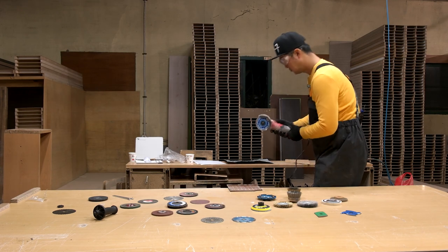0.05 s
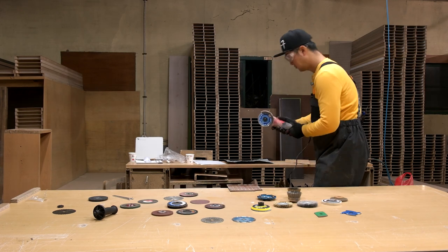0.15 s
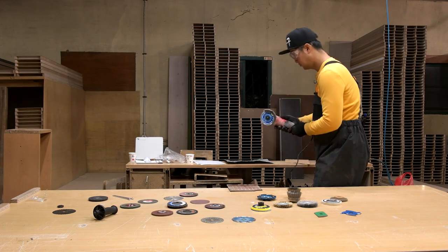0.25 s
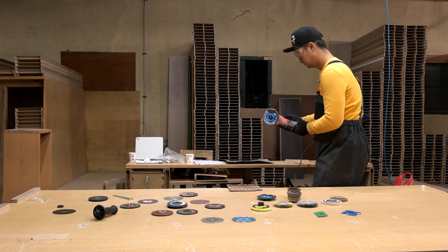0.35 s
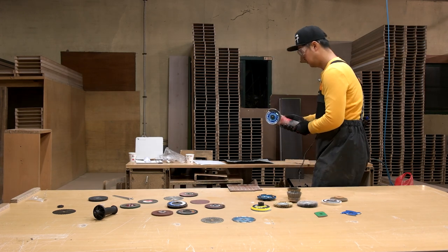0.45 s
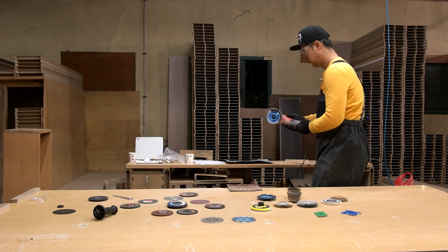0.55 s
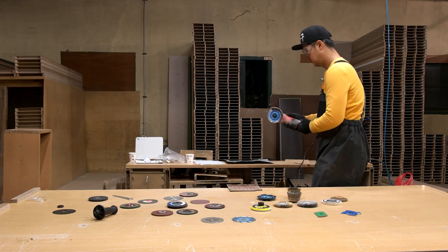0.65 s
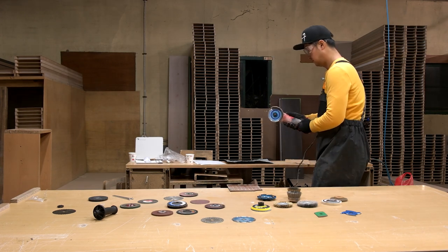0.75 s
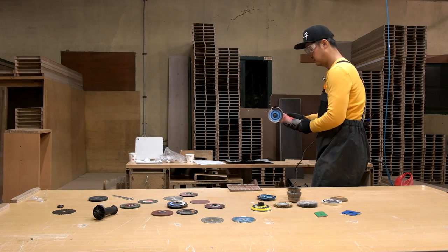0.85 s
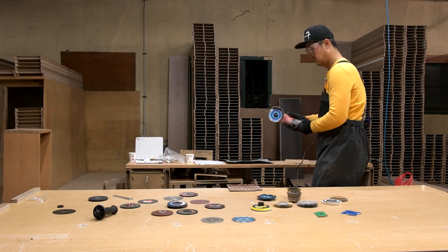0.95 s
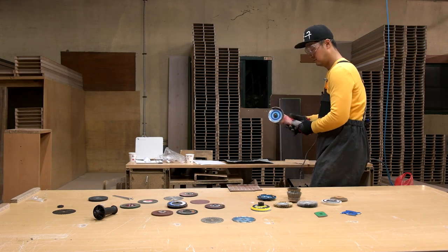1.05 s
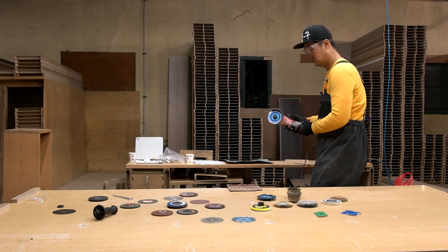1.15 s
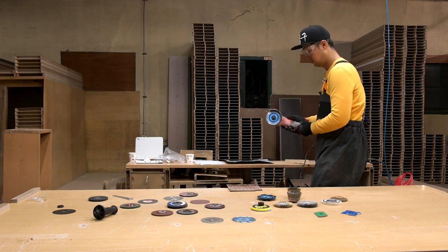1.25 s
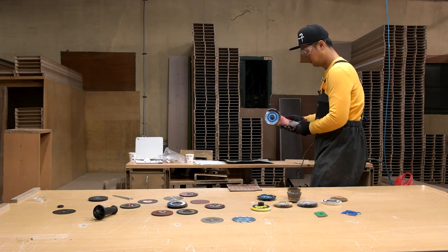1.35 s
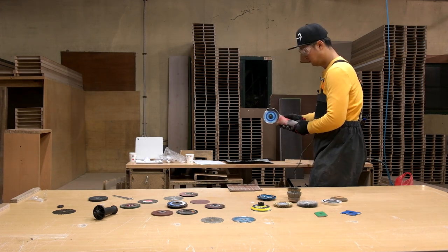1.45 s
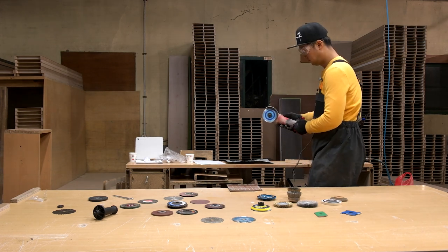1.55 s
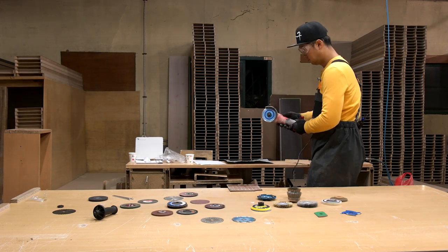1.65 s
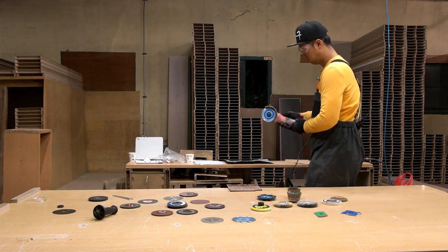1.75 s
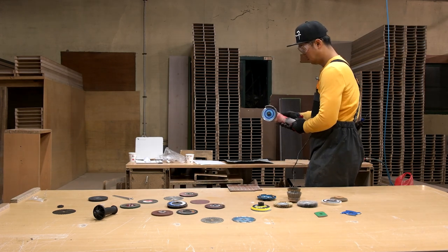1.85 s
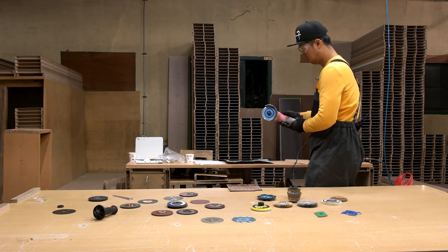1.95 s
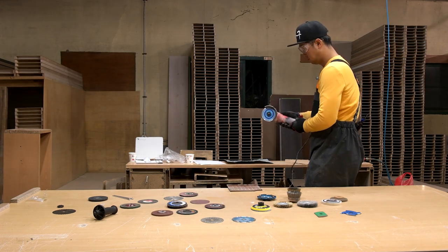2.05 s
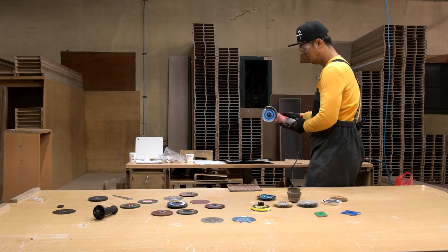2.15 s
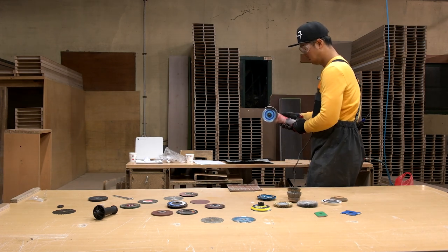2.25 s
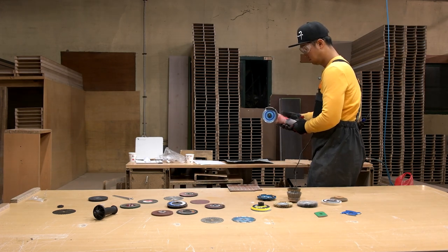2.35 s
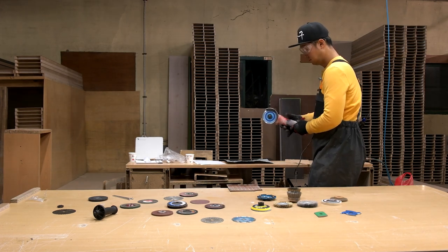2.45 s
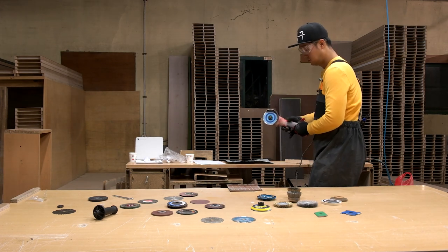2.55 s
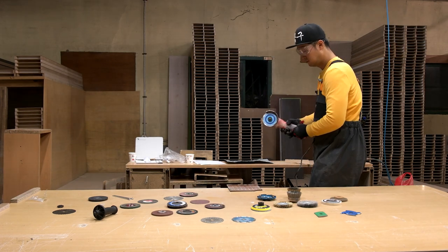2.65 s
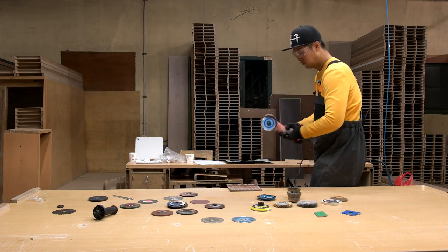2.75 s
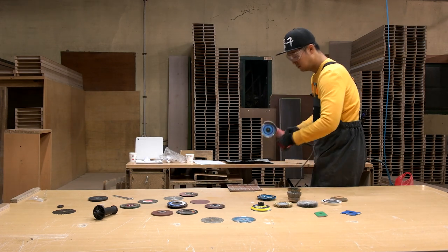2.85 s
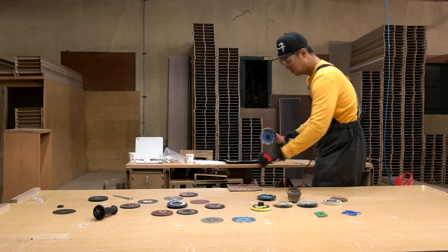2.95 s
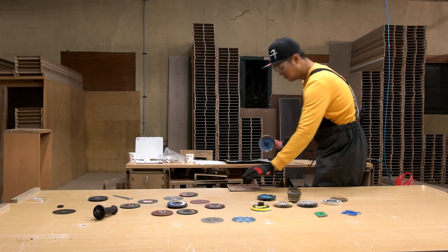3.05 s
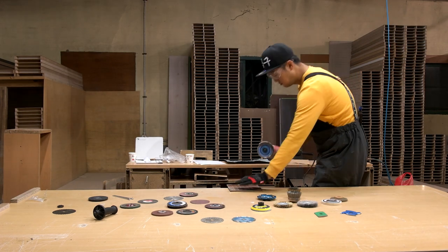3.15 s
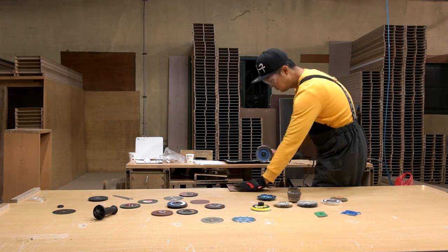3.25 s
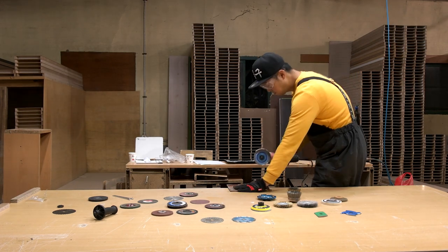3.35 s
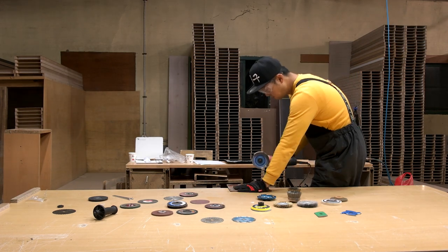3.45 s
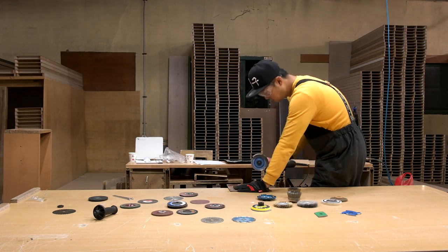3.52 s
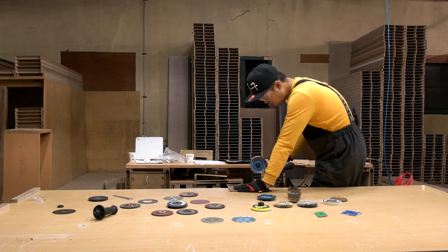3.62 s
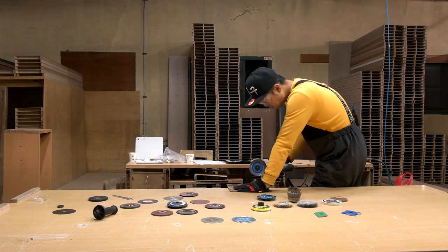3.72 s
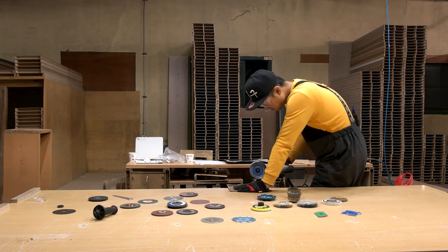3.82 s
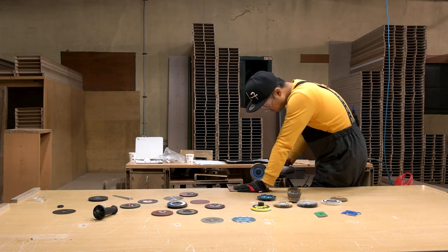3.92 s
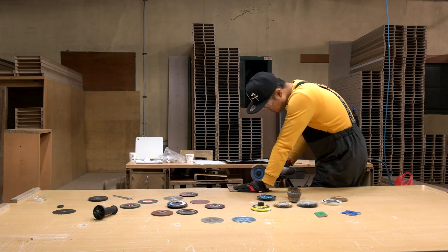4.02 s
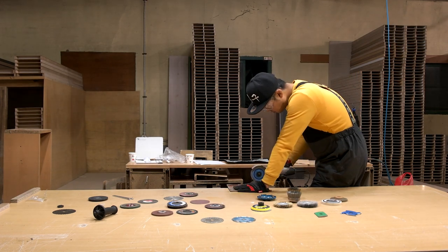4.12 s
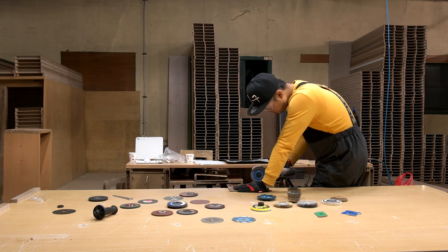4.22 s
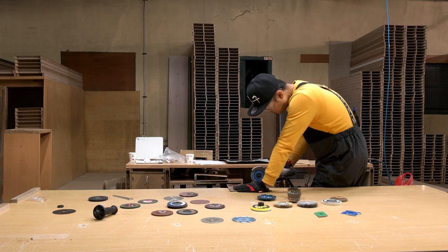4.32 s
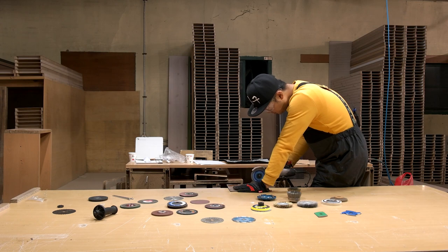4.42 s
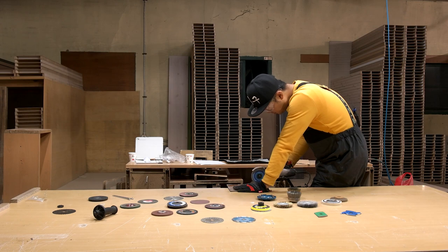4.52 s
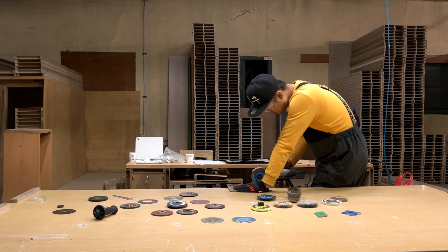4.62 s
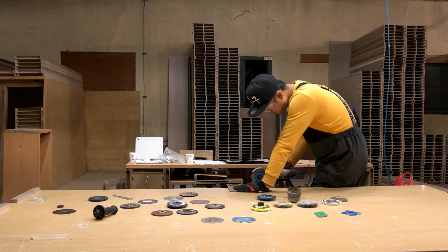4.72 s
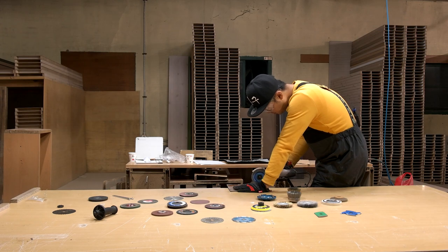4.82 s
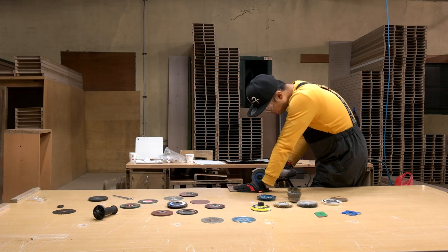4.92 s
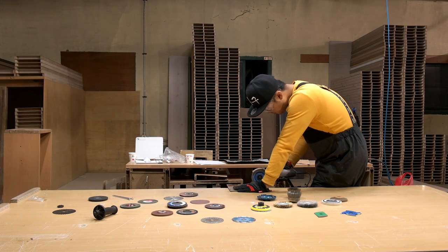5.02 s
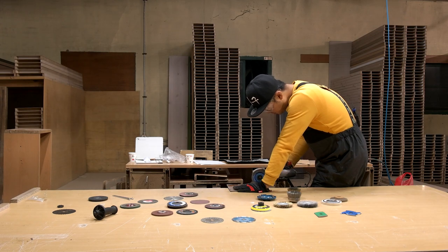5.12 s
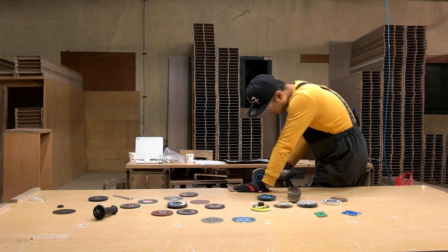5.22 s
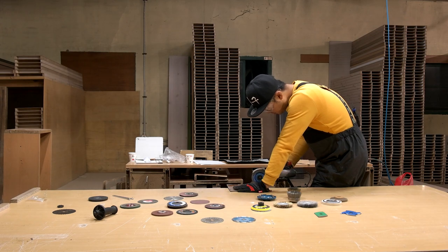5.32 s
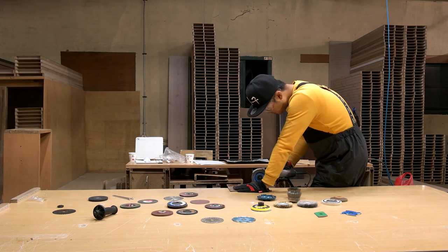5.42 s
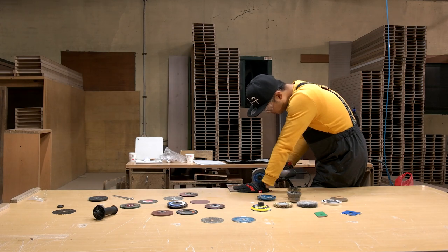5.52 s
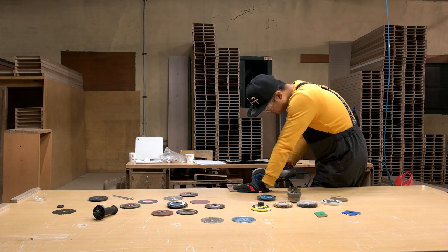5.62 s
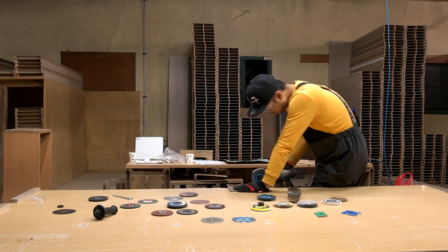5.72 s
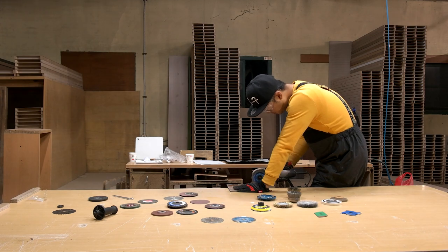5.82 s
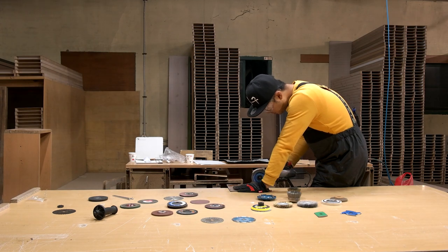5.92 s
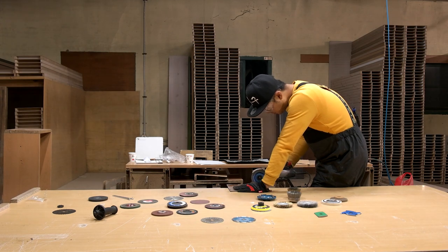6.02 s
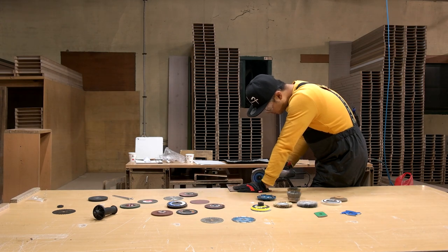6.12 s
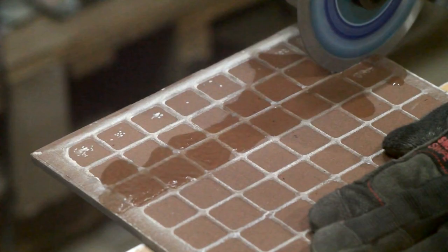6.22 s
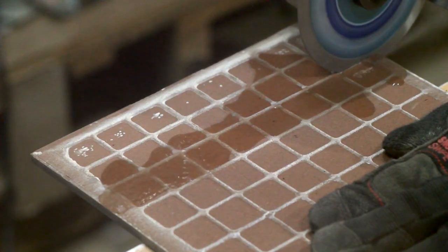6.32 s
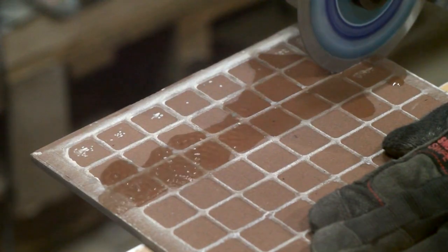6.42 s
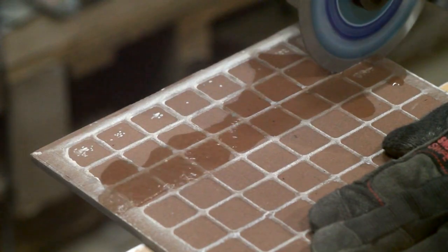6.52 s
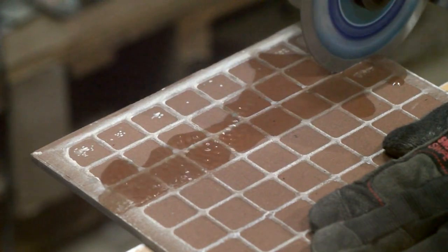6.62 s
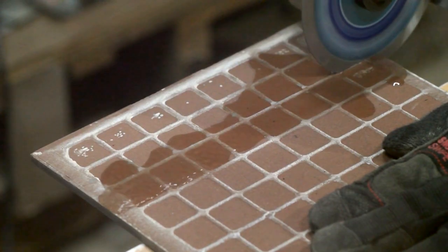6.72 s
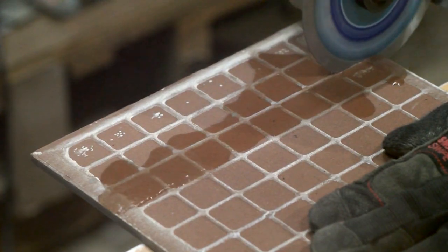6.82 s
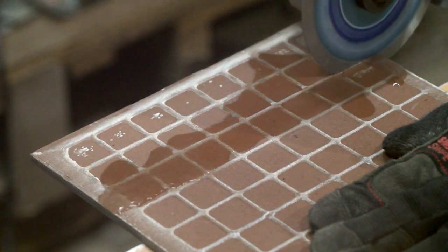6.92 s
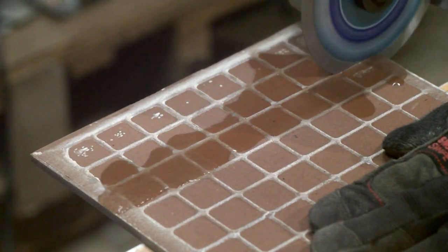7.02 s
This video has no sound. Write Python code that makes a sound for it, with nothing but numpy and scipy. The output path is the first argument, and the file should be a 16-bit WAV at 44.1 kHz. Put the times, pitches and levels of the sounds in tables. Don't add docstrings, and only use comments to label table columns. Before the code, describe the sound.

Near-silent hall wash with a faint electrical buzz, then an angle grinder kicks on briefly and coasts down with loose gear clatter. It restarts with a hard growl, climbs to a loud, airy, whining full speed and holds. At the end the disc bites into tile, adding gritty grinding, ringing and thin squeals. Close stereo microphones in a large reverberant workshop, slightly overloaded by the loud tool.

```python
import sys
import numpy as np
from scipy import signal
from scipy.fft import rfft, irfft, next_fast_len
from scipy.io import wavfile
from scipy.ndimage import uniform_filter1d

SR = 44100
rng = np.random.default_rng(int(sys.argv[2]) if len(sys.argv) > 2 else 0)


def field_ratio(decibels):
    return 10 ** (np.asarray(decibels, dtype=float) / 20)


def wrap_up_sound(samples):
    columns = np.atleast_2d(samples).T
    tamed = np.clip(columns, -1, 1)
    steps = np.round(tamed * 32767).astype(np.int16)
    wavfile.write(sys.argv[1], SR, steps)


N = 311787
T = np.arange(N) / SR

# [f/Hz, level/dB per Hz]
HALL_COLOUR = [(18, -47), (30, -22), (284, -5.5), (431, -8), (727, -3), (873, -7), (944, -5), (2180, -8.5),
               (6360, -8), (15400, -17)]
# [f/Hz, level/dB]
LAMP = [(958.2, -70), (2040, -74), (3601, -73), (4560, -83), (5879, -72), (6002, -72), (6121, -72),
        (6239, -73), (6481, -72), (7321, -73), (8166, -80), (8640, -82)]
# [f/Hz, likeness 0-1]
LIKENESS = [(60, 0.03), (150, 0.4), (380, 0.96), (950, 0.76), (2380, 0.24), (5980, 0.1), (15000, 0.031)]
# [f/Hz, t60/s]
HALL_DECAY = [(200, .7), (2000, .5), (8000, .3), (16000, .16)]
# [t/s, aim/turns per s, time constant/s]
STAGES = [
    (.695, 443, .1),
    (1.0, 0, 1.45),
    (1.89, 510, .21),
    (2.2, 611, .39),
    (5.4, 606, .3),
]
# [start t/s, rise/s, end t/s, first level/dB, last level/dB]
SURGES = [
    (.696, 0.0056, 0.889, -14, -9.5),
    (1.895, 0.053, 2.017, -6, -8.5),
]
# [t/s, peak level/dB]
SLAPS = [(1.325, -4), (1.3774, -5), (1.5364, -13), (1.554, 1.5), (1.5885, -2), (1.696, 3.5), (1.755, -12),
         (1.7984, -6), (1.8164, -18), (1.83, -9), (1.84, -17), (1.8694, 2), (1.899, -1), (1.9065, 1.5)]
# [f/Hz, width/Hz, level/dB]
HOUSING = [(449, 64, -23), (975, 660, -16), (2727, 374, 2.5), (3890, 850, -6), (5320, 560, -15.5),
           (7160, 810, -3.5), (8150, 680, -8.5), (13700, 900, -28)]
# [f/Hz, level/dB per Hz]
RATTLE_BODY = [(88, -75), (150, -50), (427, -10.5), (2220, 6), (2750, -32), (4830, -2.5), (8150, 6.5),
               (10700, -114), (15400, 2.5)]
# [f/Hz, level/dB per Hz]
ROAR = [(88, -58), (150, -38.5), (427, -25), (462, -21.5), (606, -14), (1000, -10.5), (1220, -8),
        (1630, -5.5), (2920, -4.5), (4920, -8), (7250, -8.5), (11800, -18), (15400, -23.5)]
# [multiple of its rotation, level/dB]
SHAFT_ORDERS = [(2, -31), (3, -33), (4, -33), (9, -37), (10, -36), (12, -35)]
# [t/s, level/dB]
BITE = [
    (5.2, -28),
    (5.44, -16),
    (5.66, -25),
    (5.81, -18),
    (6.12, -19),
    (6.6, -16),
    (7.07, -14.5),
]
DISC_HZ = [1476, 2267, 2350, 2622, 2755, 2956, 3013, 3321, 3646, 3931, 4022, 4352, 4754, 6251, 6739, 7720,
           8053, 8292, 8975, 9320, 10072, 10131, 10256, 10622, 11350, 11924, 11998, 12498, 14110, 14700]
# [width/Hz, level at first touch/dB, level in a deep groove/dB]
DISC_MODES = [(22, -22.5, -32.5), (18, -28, -29), (20, -34, -31), (11, -22, -25), (20, -41, -44),
              (20, -20, -36), (20, -29, -27.5), (20, -38, -44), (10, -24, -36), (24, -18.5, -39),
              (40, -17, -26), (24, -22, -34), (10, -32, -33), (18, -24, -27.5), (19.9, -20, -26.5),
              (17.9, -23, -24.5), (40, -17.5, -30), (40, -34, -30), (70, -28, -28), (50, -38, -39),
              (40, -27.5, -27), (30, -33, -35), (30, -30, -31), (45, -36, -30), (50, -26, -42),
              (30, -28, -28.5), (28, -25, -34), (50, -28, -30), (120, -35, -39), (260, -31, -32)]
# [f/Hz, level/dB per Hz]
GRIND = [(88, -64), (150, -36), (320, -18), (436, -18), (618, -17.5), (2020, -7.5), (2590, -0.5),
         (5020, -18.5), (6580, -11.5), (12300, -17.5), (13500, -23), (15400, -27)]
# [multiple of its rotation, level/dB]
SPINDLE_ORDERS = [(2, -45), (2.5, -42), (4, -47), (6, -47)]
# [start t/s, end t/s, f/Hz, level/dB]
SQUEALS = [(5.85, 7.1, 2622, -24), (5.58, 6.06, 3931, -22), (6.3, 6.86, 3647, -21), (6.2, 6.76, 4755, -23),
           (5.54, 7.1, 6739, -24.5), (5.54, 7.1, 7720, -28), (6.1, 7.1, 2267, -26), (5.5, 7.1, 11998, -33),
           (5.7, 7.1, 10256, -36)]
# [f/Hz, level/dB]
TREBLE_DROOP = [(14600, 0), (15100, -5), (15800, -12)]

FAN_BLADES, PINION_TEETH, GEAR_RATIO = 35, 12, 3.755
SWITCH_S, RELEASE_S, RESTART_S = .684, 1.0, 1.89
CREEP, FULL = 30, 610
TAKE_UP_DB = -22


def evened(x):
    return x / np.sqrt(np.mean(x ** 2) + 1e-20)


def read(points, hz):
    f, value = np.transpose(points)
    return np.interp(np.log(hz + 1), np.log(f + 1), value)


def coloured(x, spectrum):
    size = next_fast_len(N)
    gain = field_ratio(read(spectrum, np.fft.rfftfreq(size, 1 / SR)))
    return evened(irfft(rfft(x, size) * gain, size)[..., :N])


def slow(per_s, size=N):
    steps = rng.standard_normal(size // 64 + 2)
    span = max(int(SR / 64 / per_s), 1)
    drift = evened(uniform_filter1d(uniform_filter1d(steps, span), span))
    return np.interp(np.arange(size) / 64, np.arange(len(steps)), drift)


def tone(phase_turns, db):
    return field_ratio(db) * np.sqrt(2) * np.sin(2 * np.pi * (phase_turns + rng.random()))


def orders(turns, table):
    return sum(tone(k * turns, db + 2.5 * slow(2.8)) for k, db in table)


def ring(x, hz, width):
    r = np.exp(-np.pi * abs(width) / SR)
    return evened(signal.lfilter([1, 0, -1], [1, -2 * r * np.cos(2 * np.pi * hz / SR), r * r], x))


def gliding_band(x, hz, width):
    turn = np.exp(2j * np.pi * np.cumsum(hz * np.ones(N)) / SR)
    r = np.exp(-np.pi * abs(width) / SR)
    for _ in range(2):
        x = evened((turn * signal.lfilter([1 - r], [1, -r], x / turn)).real)
    return x


def diffuse():
    size = next_fast_len(N)
    a, b = rfft(rng.standard_normal((2, size)))
    same = np.clip(read(LIKENESS, np.fft.rfftfreq(size, 1 / SR)), 0, 1)
    return irfft(np.array([a, same * a + np.sqrt(1 - same ** 2) * b]), size)[:, :N]


def hall_floor():
    a, b = rng.standard_normal((2, N))
    wash = coloured(np.array([a + 0.11 * b, 0.13 * a + b]), HALL_COLOUR)
    wash_db = np.maximum(-49 - 6 * T, -55) + 4 * np.exp(-T / .05)
    return wash * field_ratio(wash_db) + sum(tone(hz * T, db) for hz, db in LAMP)


def switched_on():
    return np.clip((T - SWITCH_S) / 0.0059, 0, 1) ** 2


def motor_speed():
    speed = np.full(N, float(CREEP))
    for s, aim, tau in STAGES:
        at = round(s * SR)
        speed[at:] = aim + (speed[at] - aim) * np.exp(-(T[at:] - s) / tau)
    return speed


def states():
    coasting = uniform_filter1d(1. * (T > RELEASE_S - .06) * (T < RESTART_S), 900)
    cutting = np.clip((T - 5.45) / 1.04, 0, 1)
    return coasting, cutting


def surge():
    gain, fade_s = np.zeros(N), 0.028
    for s, rise, end, first_db, last_db in SURGES:
        times = np.cumsum([s - .001, .001, rise, end - s - rise, fade_s, fade_s])
        gain += field_ratio(np.interp(T, times, [-60, TAKE_UP_DB, first_db, last_db, TAKE_UP_DB, -60]))
    return gain


def rattle():
    coasting, cutting = states()
    driven_db = np.where(T < SURGES[0][0], TAKE_UP_DB, -17 + 1 * cutting)
    loose_db = -14 - 8.5 * (T - RELEASE_S)
    return np.hypot(field_ratio(driven_db + coasting * (loose_db - driven_db)), surge())


def knocks(per_s, spread_db):
    hit = rng.random(N) < per_s / SR
    size = rng.exponential(1, N)
    sign = rng.choice([-1., 1.], N)
    return evened(hit * sign * field_ratio(spread_db * np.minimum(size, 5)))


def gears():
    teeth = knocks(3000, spread_db=3.5) * field_ratio(0.82 * slow(25))
    for s, db in SLAPS:
        teeth[round(s * SR)] += field_ratio(db + 32)
    rings = sum(field_ratio(db) * ring(ring(teeth, hz, width), hz, width) for hz, width, db in HOUSING)
    body = field_ratio(2.5) * coloured(teeth, RATTLE_BODY)
    return field_ratio(-5) * rattle() * (rings + body) * switched_on()


def fan_roar(air, speed):
    _, cutting = states()
    steady = field_ratio(-16.5 + 33.5 * np.log10(speed / FULL) - 3.5 * cutting)
    pushed = field_ratio(-15) * surge() * speed / 300
    return field_ratio(8.0) * np.hypot(steady, pushed) * coloured(air, ROAR)


def tooth_mesh(air, speed):
    coasting, cutting = states()
    mesh_hz = PINION_TEETH * speed
    pull_db = 5.5 * np.clip((FULL - speed) / 30, 0, 1) - 0.8 * np.maximum(290 - speed, 0)
    slack_db = -0.5 * np.maximum(330 - speed, 0)
    mesh_db = (1 - coasting) * (-21 + pull_db - 20 * cutting) + coasting * (-25.5 + slack_db)
    broad = field_ratio(mesh_db) * gliding_band(diffuse(), mesh_hz, 1260)
    ridge = coasting * field_ratio(-29 + slack_db) * gliding_band(air, mesh_hz, 530)
    return broad + ridge


def blade_whine(air, speed):
    whine_hz = FAN_BLADES * speed
    whine_db = -21.5 + 35 * np.log10(speed / FULL) - 14 * np.clip(surge() / .3, 0, 1)
    return field_ratio(whine_db) * gliding_band(air, whine_hz, 330) * (whine_hz < 17000)


def shaft_tones(speed, turns):
    grip_db = 11 * np.exp(-((speed - 582) / 16) ** 2)
    tones = orders(turns, SHAFT_ORDERS) * (speed / FULL) ** 18
    tones = tones + field_ratio(grip_db) * orders(turns, [(1, -42)]) * (speed / FULL) ** 8
    eased = 1 - 0.32 * np.clip((T - 5.7) / .2, 0, 1)
    return field_ratio(1.0) * tones * eased


def motor(speed, turns):
    air = diffuse() * field_ratio(.6 * slow(15) + .8 * slow(60))
    noises = fan_roar(air, speed) + tooth_mesh(air, speed) + blade_whine(air, speed)
    return (noises + shaft_tones(speed, turns)) * switched_on()


def cut(turns):
    bite_db = np.interp(T, *np.transpose(BITE))
    spindle = turns / GEAR_RATIO
    wobble = 1 + 0.6 * np.cos(2 * np.pi * spindle) + 0.31 * np.cos(np.pi * spindle)
    wobble = wobble * field_ratio(2.15 * slow(25))
    start = round(BITE[0][0] * SR)
    grit = (diffuse() * wobble)[:, start:]
    depth = np.clip((T[start:] - 5.5) / 0.79, 0, 1)
    rings = np.zeros((2, N))
    for k, (hz, (width, first_db, deep_db)) in enumerate(zip(DISC_HZ, DISC_MODES)):
        wander_db = 1.9 * slow(0.78, size=N - start)
        mode_db = first_db + (deep_db - first_db) * depth + wander_db
        rings[:, start:] += (-1) ** k * field_ratio(mode_db) * ring(grit, hz, width)
    grind = field_ratio(-15.5) * coloured(diffuse() * wobble, GRIND)
    touch = np.clip((T - 5.42) / 0.14, 0, 1) * field_ratio(bite_db + 21.5)
    return touch * (field_ratio(0.36) * rings + grind + orders(spindle, SPINDLE_ORDERS))


def squeals():
    out, jitter = np.zeros((2, N)), .7
    for s, end, hz, db in SQUEALS:
        held = np.clip(np.minimum(T - s, end - T) / .06, 0, 1) * field_ratio(db + 2.5 * slow(7.9))
        phase = 2 * np.pi * hz * T + jitter * slow(14)
        out += held * np.sqrt(2) * np.sin([phase, phase + jitter * slow(4.1)])
    return out


def hall_tails(count, size):
    hz, t, z = signal.stft(rng.standard_normal((count, 2, size)), SR, nperseg=256)
    same = np.clip(read(LIKENESS, hz), 0, 1)[:, None]
    t60 = read(HALL_DECAY, hz)[:, None]
    z = np.stack([z[:, 0], same * z[:, 0] + np.sqrt(1 - same ** 2) * z[:, 1]], axis=1)
    tails = signal.istft(z * field_ratio(-60 * t / t60) / np.sqrt(t60), SR, nperseg=256)[1][..., :size]
    return tails * (np.arange(size) > 200) / np.linalg.norm(tails[0, 0])


def hall(x, direct_db):
    hop, size = 12000, 20000
    count = N // hop + 2
    tails = hall_tails(count, size)
    padded, out = np.pad(x, (hop, 2 * hop)), np.zeros((2, N + 3 * hop + size))
    fade = np.sin(np.pi * np.arange(2 * hop) / (2 * hop))
    for k in range(count - 1):
        at = k * hop
        stretch = padded[at:at + 2 * hop] * fade
        out[:, at:at + 2 * hop + size - 1] += signal.fftconvolve(stretch[None], tails[k], axes=1)
    return out[:, hop:hop + N] + field_ratio(direct_db) * x


def scene():
    speed = motor_speed()
    turns = np.cumsum(speed) / SR
    spread = motor(speed, turns) + cut(turns)
    tool = hall(gears() + .55 * spread[0], direct_db=-7) + .8 * spread
    balance = field_ratio([[-.1], [.1]])
    return tool * balance + hall_floor() + squeals()


def top_cut(x):
    return signal.sosfilt(signal.butter(12, 15600, fs=SR, output="sos"), x)


def record(dry):
    squashed = dry / (1 + abs(dry / 1.01) ** 4.4) ** 0.19
    droop = field_ratio(read(TREBLE_DROOP, np.linspace(0, SR / 2, 257)))
    taps = np.roll(irfft(droop), 256) * np.hanning(512)
    return top_cut(signal.oaconvolve(squashed, taps[None], "same"))


dry = scene()
out = record(dry)
wrap_up_sound(out)
```